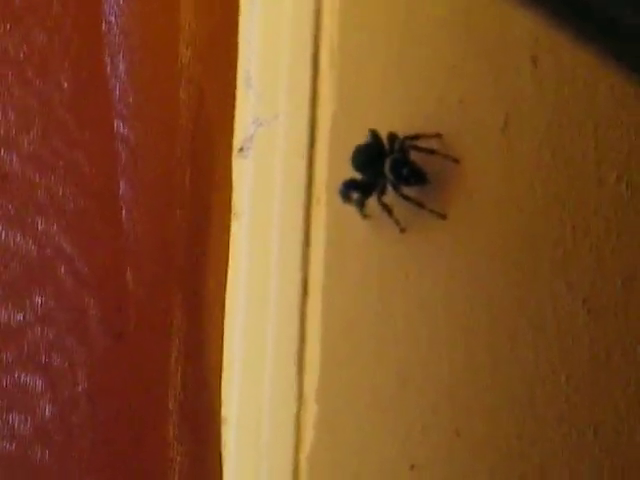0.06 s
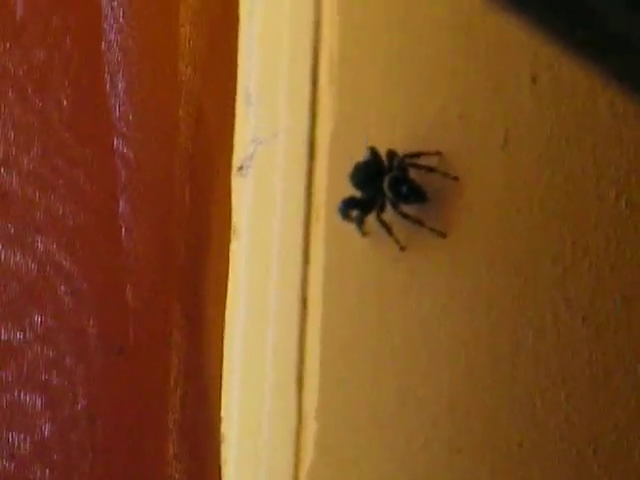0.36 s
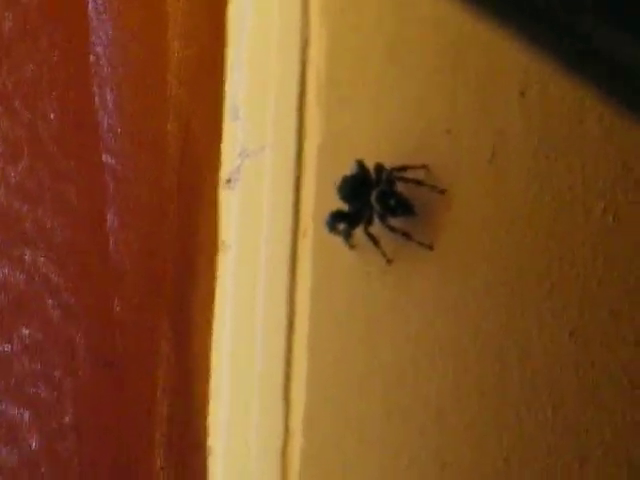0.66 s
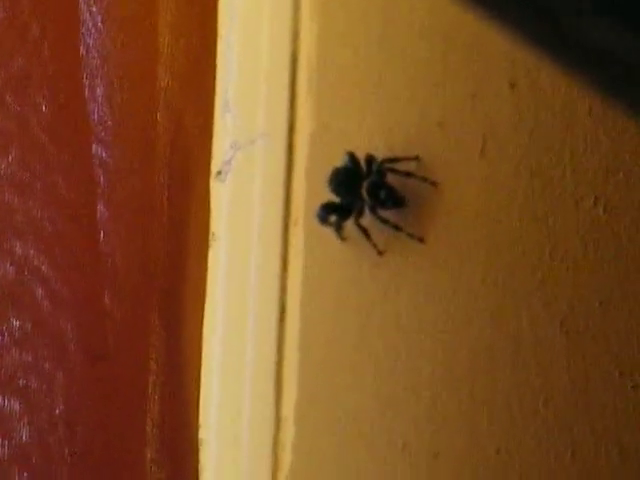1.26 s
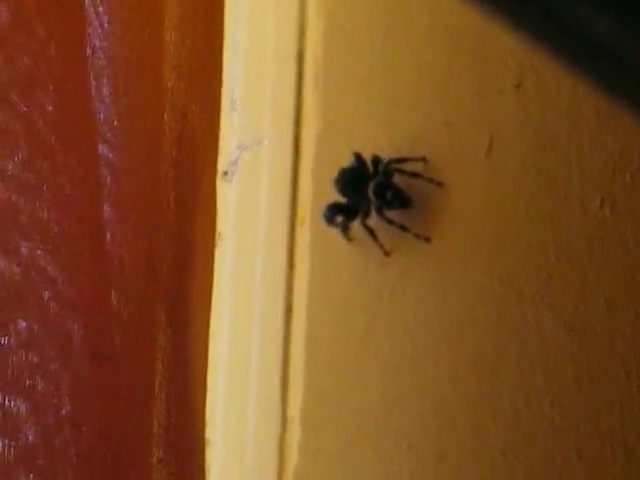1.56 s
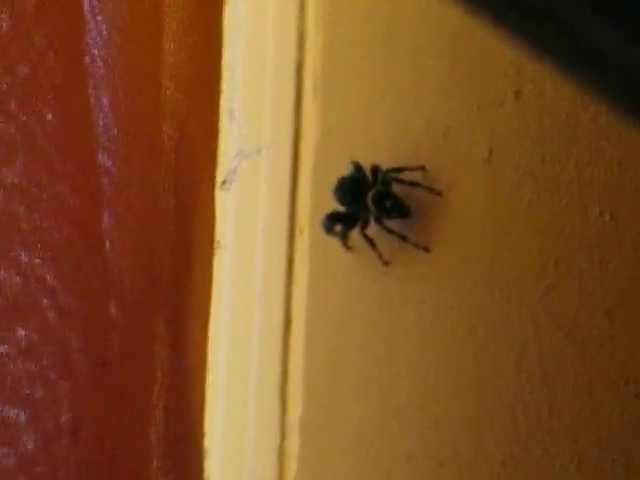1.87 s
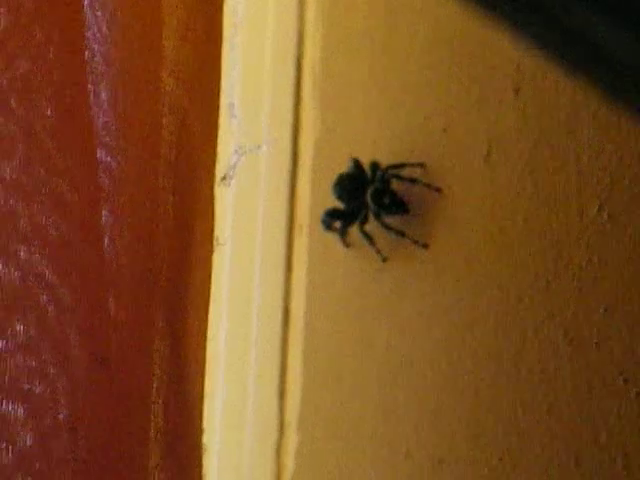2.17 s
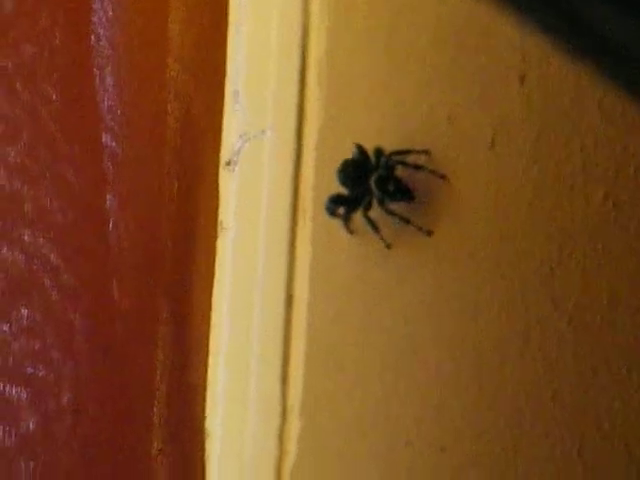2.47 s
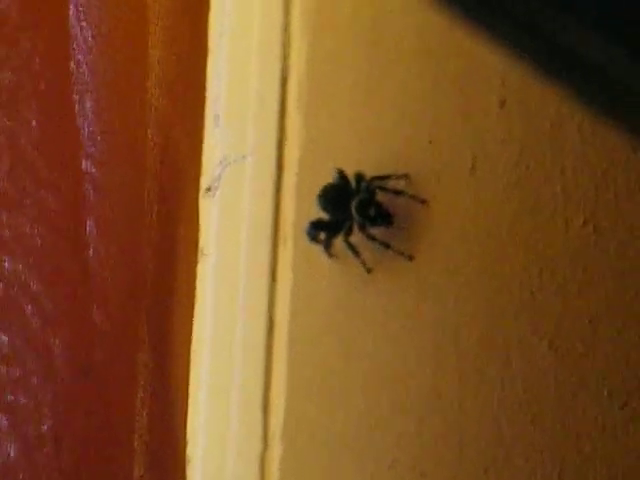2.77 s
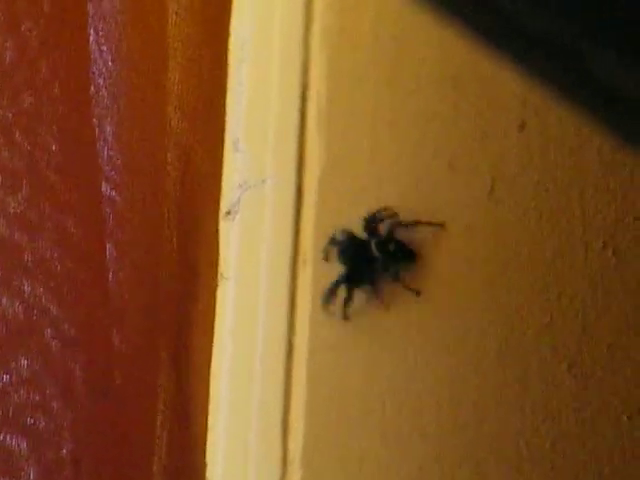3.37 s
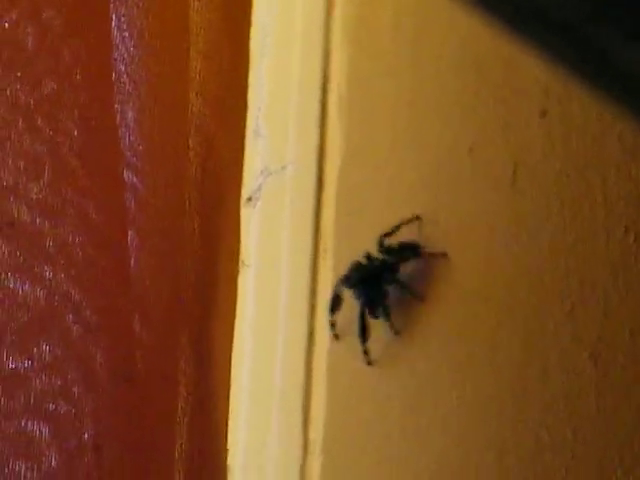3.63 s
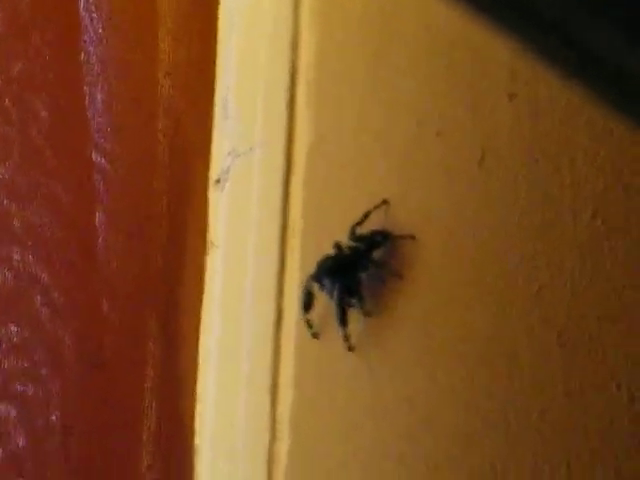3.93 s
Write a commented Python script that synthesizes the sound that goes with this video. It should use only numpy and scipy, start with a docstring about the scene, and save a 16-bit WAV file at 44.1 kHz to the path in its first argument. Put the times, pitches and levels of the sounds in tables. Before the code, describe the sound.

A motor appliance hums low in a quiet room for the whole four seconds, fluttering and throbbing in bunches about twice a second. Beneath it are a rumble and soft churning swells. Air rushes steadily, with a hollow ringing that lifts around 0.8 to 1.4 seconds, near 2.5, and again at 3.5 and 3.9 seconds. A small camera microphone adds faint hiss.

```python
"""A motor appliance hums in a quiet room, mainly at twice the mains frequency.
The hum flutters, and throbs in bunches about twice a second, over a low rumble and churning swells.
A steady rush of air excites narrow resonances; a hollow ringing near 1 kHz lifts now and then.
All is heard through a small camera: its microphones hiss, and it notches and limits the treble."""
import sys
import numpy as np
from scipy import signal
from scipy.fft import rfft, irfft
from scipy.io import wavfile

SR = 44100
rng = np.random.default_rng(int(sys.argv[2]) if len(sys.argv) > 2 else 0)


def dump(signal):
    """Clip the signal to [-1, 1] and save it as 16-bit WAV at the path in sys.argv[1]."""
    limited = np.clip(np.atleast_2d(signal).T, -1, 1)
    pcm = np.round(limited * 32767).astype(np.int16)
    wavfile.write(sys.argv[1], SR, pcm)


N = 176400

# motor tones between throbs (frequency [Hz], rms level [dB])
HUM_TONES = [(101.7, -50.5), (119.95, -38.5), (135.8, -56), (152.6, -54), (599.8, -65.5)]
# hum throbs (peak time [s], rise [dB])
HUM_THROBS = [(.11, 6.5), (.2, 7.5), (.42, 2.5), (.52, 9), (.69, 7), (.9, 0.5), (1.02, 6.5), (1.13, 7.5),
              (1.27, 2.5), (1.51, 7), (1.6, 5), (1.76, 4.5), (2.01, 7), (2.11, 7), (2.33, 3), (2.59, 8.5),
              (2.68, 7.5), (2.77, 5), (2.86, 5), (3.08, 9), (3.2, 7), (3.46, 5.5), (3.57, 8), (3.67, 3),
              (3.84, 4.5)]
# steady rumble (frequency [Hz], density [dB re 1/Hz])
RUMBLE_SPECTRUM = [(8, -83), (22, -77), (48, -67), (68, -61.5), (88, -58), (130, -57), (180, -62),
                   (240, -59), (316, -60), (352, -74), (440, -83), (900, -110)]
# even churning (frequency [Hz], density [dB re 1/Hz])
CHURN_SPECTRUM = [(60, -73), (170, -76), (215, -59), (266, -57.5), (300, -64.5), (360, -78), (600, -118)]
# rumble and churning, left-right likeness (frequency [Hz], correlation [0..1])
LOW_CORRELATION = [(25, 0.72), (100, 0.97), (200, 0.94), (300, 1)]
# churning swells (peak time [s], centre [Hz], rms level at peak [dB])
CHURN_SWELLS = [(.19, 215, -37.5), (.52, 285.3, -41), (.71, 258, -31), (.88, 289.4, -38.5),
                (1.15, 251.2, -37.5), (1.19, 155, -33), (1.3, 260, -32.5), (1.53, 269.7, -32.5),
                (1.59, 142.4, -36.5), (1.72, 255, -31), (1.81, 292.4, -32.5), (2.17, 303.7, -36),
                (2.33, 267, -36), (2.58, 235.4, -40), (2.64, 91.7, -37), (2.77, 260, -33.5),
                (2.88, 269.3, -34), (3.185, 245, -31), (3.26, 260.6, -33.5), (3.68, 288, -32.5),
                (3.78, 266.3, -30)]
# rush of air (frequency [Hz], density [dB re 1/Hz])
AIR_SPECTRUM = [(100, -72.5), (440, -77), (570, -73.5), (710, -71.5), (950, -71.5), (1090, -71),
                (1220, -73.5), (1650, -74.5), (2100, -74.5), (2550, -76.5), (3600, -77), (5000, -81),
                (6000, -86), (7000, -93.5), (8500, -112), (14000, -130)]
# rush, left-right likeness (frequency [Hz], correlation [0..1])
AIR_CORRELATION = [(450, 1), (700, 0.91), (1100, 0.92), (1700, 0.78), (2100, 0.77), (2500, 0.32),
                   (5300, 0.31), (6500, .05)]
# rush and resonances, balance (frequency [Hz], left minus right [dB])
AIR_BALANCE = [(500, 0.5), (1200, 0), (2500, -2.5), (3800, 0), (6500, -1)]
# narrow air resonances (centre [Hz], half-width [Hz], rms level [dB])
AIR_RESONANCES = [(402, 8.8, -52.5), (485, 7.6, -56), (561, 23, -61), (787, 18, -57), (997, 15, -57),
                  (1158.5, 17, -51.5), (1283, 15, -54.5), (1420, 21, -55.5), (1536, 22, -52),
                  (1662, 18, -56), (1952, 20, -60.5), (2020, 17, -65), (2216, 13, -71), (2290, 18, -69),
                  (3220, 69, -59.5), (3710, 84, -62.5), (4400, 100, -61.5)]
# hollow ringing between lifts (centre [Hz], half-width [Hz], rms level [dB])
HOLLOW_RESONANCES = [(893, 19, -55), (943, 30, -54), (997, 12, -54.5), (1050, 66, -58.5)]
# lifts of the hollow ringing (peak time [s], rise [dB])
HOLLOW_LIFTS = [(.08, 2), (.79, 8), (.93, 6), (1.13, 7), (1.35, 8), (2.42, 9), (2.58, 9), (3.38, 3),
                (3.52, 6), (3.92, 7.5)]
# microphone hiss (frequency [Hz], density [dB re 1/Hz])
HISS_SPECTRUM = [(1000, -112), (7000, -98.5), (9000, -94), (11000, -91), (13400, -92)]

TIME_S, FREQ_HZ = np.arange(N) / SR, np.fft.rfftfreq(N, 1 / SR)
MOTOR_LEFT_DB = 1.06


def gain_of(db):
    """Decibels to amplitude gain."""
    return 10 ** (np.asarray(db) / 20)


def curve(table):
    """Table interpolated over log frequency, one value per bin."""
    hz, value = np.transpose(table)
    return np.interp(np.log(FREQ_HZ + 1), np.log(hz + 1), value)


def pan(left_db):
    """Channel gains for a left-minus-right level."""
    return gain_of(np.array([[.5], [-.5]]) * left_db)


def noise(amplitude_per_root_hz, correlation, left_db):
    """Shaped stereo noise from independent mid and side parts."""
    mid, side = rfft(rng.standard_normal((2, N)))
    mid *= np.sqrt((1 + correlation) / 2)
    side *= np.sqrt((1 - correlation) / 2)
    spectrum = np.array([mid + side, mid - side]) * amplitude_per_root_hz * pan(left_db)
    return irfft(spectrum, N) * np.sqrt(SR / 2)


def drift(rate_hz):
    """Smooth random motion, mean 0, rms 1."""
    lowpass = np.exp(-(FREQ_HZ / rate_hz) ** 2) * (FREQ_HZ > 0)
    motion = irfft(rfft(rng.standard_normal(N)) * lowpass, N)
    return motion / motion.std()


def smooth(x, span_steps, axis=-1):
    """One-pole smoothing, not normalised."""
    return signal.lfilter([1], [1, -np.exp(-1 / span_steps)], x, axis=axis)


def bumps_db(table, width_s):
    """Bell-shaped level rises at the listed times."""
    return sum(rise_db * np.exp(-((TIME_S - peak_s) / width_s) ** 2) for peak_s, rise_db in table)


def motor_hum(waver_db=0.5, flutter_hz=12, flutter_db=1.5):
    """Motor tones waver separately, flutter and throb together."""
    tones = np.zeros(N)
    for hz, level_db in HUM_TONES:
        amplitude = np.sqrt(2) * gain_of(level_db + waver_db * drift(rate_hz=13))
        tones += amplitude * np.sin(2 * np.pi * (hz * TIME_S + rng.random()))
    flutter = np.sin(2 * np.pi * flutter_hz * TIME_S + drift(rate_hz=5.2))
    throb_db = bumps_db(HUM_THROBS, width_s=0.045)
    return tones * gain_of(throb_db + flutter_db * flutter) * pan(MOTOR_LEFT_DB)


def rumble(spectrum, uneven_db, uneven_hz):
    """Low appliance noise, slightly uneven in level."""
    low = noise(gain_of(curve(spectrum)), curve(LOW_CORRELATION), MOTOR_LEFT_DB)
    return low * gain_of(uneven_db * drift(uneven_hz))


def room_colour(ripple_db=1.5, ripple_hz=12):
    """Gain per bin: reflections leave fine, static peaks and dips."""
    ripple = smooth(rng.standard_normal(len(FREQ_HZ)), ripple_hz / FREQ_HZ[1])
    return gain_of(ripple_db * ripple / ripple.std())


def turbulence(rush, depth_db=0.89, patch_hz=140, patch_s=0.098):
    """Turbulence lifts and lowers narrow bands independently."""
    frame, hop = 1024, 256
    spectra = signal.stft(rush, nperseg=frame, noverlap=frame - hop)[2]
    patches = smooth(rng.standard_normal(spectra.shape[1:]), patch_hz * frame / SR, axis=0)
    patches = smooth(patches, patch_s * SR / hop, axis=1)
    spectra *= gain_of(depth_db * patches / patches.std())
    return signal.istft(spectra, nperseg=frame, noverlap=frame - hop)[1][:, :N]


def resonance(centre_hz, half_width_hz, level_db):
    """One narrow resonance excited by the air."""
    detuning = (FREQ_HZ - centre_hz) / half_width_hz
    power_per_hz = 2 / (np.pi * half_width_hz) / (1 + detuning ** 2) ** 2  # unit area
    return noise(gain_of(level_db) * np.sqrt(power_per_hz), correlation=1, left_db=curve(AIR_BALANCE))


def airflow(flutter_db=0.62):
    """A wide rush and the resonances it excites, fluttering together."""
    density = gain_of(curve(AIR_SPECTRUM)) * room_colour()
    rush = turbulence(noise(density, curve(AIR_CORRELATION), curve(AIR_BALANCE)))
    ringing = sum(resonance(*row) for row in AIR_RESONANCES)
    hollow = sum(resonance(*row) for row in HOLLOW_RESONANCES)
    hollow *= gain_of(bumps_db(HOLLOW_LIFTS, width_s=0.045))
    return (rush + ringing + hollow) * gain_of(flutter_db * drift(rate_hz=54))


def microphone_hiss():
    """Microphone self-noise, barely shared between channels."""
    return noise(gain_of(curve(HISS_SPECTRUM)), correlation=0.078, left_db=0)


def churn_swells(width_s=0.042, wander_hz=16.02):
    """Soft surges of the churning: wandering low tones under bell envelopes."""
    wander_cycles = np.cumsum(wander_hz * drift(rate_hz=40.3)) / SR
    swells = np.zeros(N)
    for peak_s, hz, level_db in CHURN_SWELLS:
        envelope = np.sqrt(2) * gain_of(level_db) * np.exp(-((TIME_S - peak_s) / width_s) ** 2)
        swells += envelope * np.sin(2 * np.pi * (hz * TIME_S + wander_cycles + rng.random()))
    return swells * pan(MOTOR_LEFT_DB)


def scene():
    """Appliance, air and hiss together, in stereo."""
    appliance = motor_hum()
    appliance += rumble(RUMBLE_SPECTRUM, uneven_db=0.8, uneven_hz=12.4)
    appliance += rumble(CHURN_SPECTRUM, uneven_db=1.05, uneven_hz=9.7)
    appliance += churn_swells()
    return appliance + airflow() + microphone_hiss()


def record(dry):
    """The camera cuts a narrow treble notch and limits the band."""
    notch_hz, notch_width_hz, cutoff_hz = 7900, 380, 13550
    notch = (1 - np.exp(-((FREQ_HZ - notch_hz) / notch_width_hz) ** 2)) ** 2
    notched = irfft(rfft(dry) * notch, N)
    lowpass = signal.firwin(1023, cutoff_hz, window=("kaiser", 9), fs=SR)
    return signal.oaconvolve(notched, lowpass[None], "same")


dry = scene()
out = record(dry)
dump(out)
```